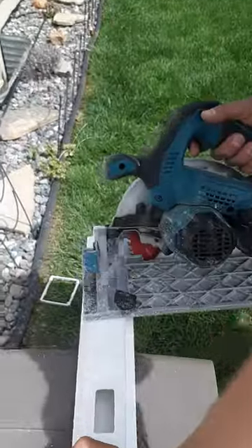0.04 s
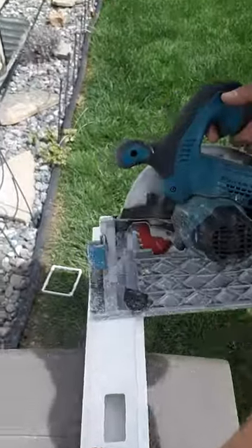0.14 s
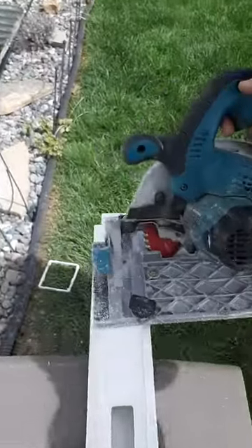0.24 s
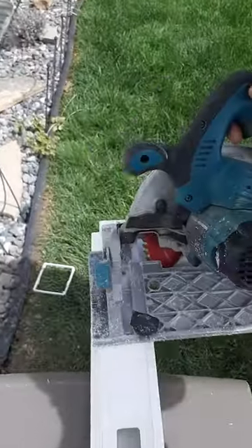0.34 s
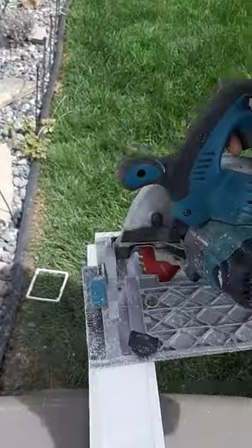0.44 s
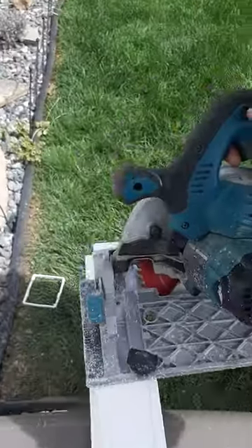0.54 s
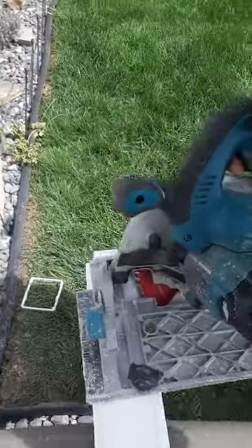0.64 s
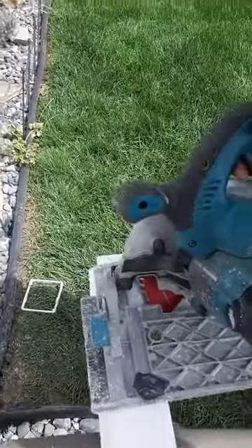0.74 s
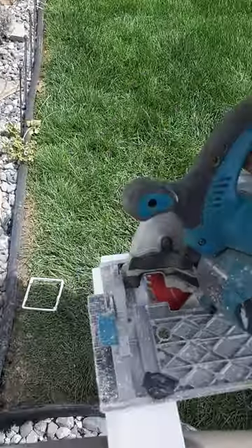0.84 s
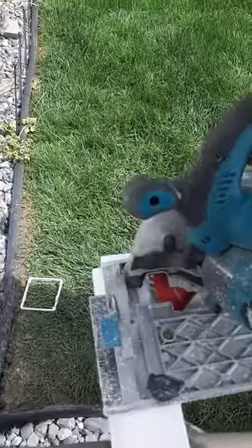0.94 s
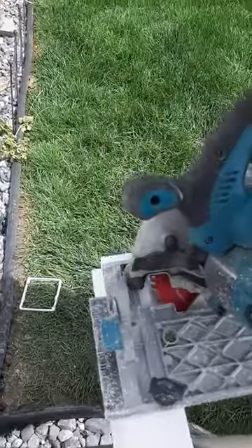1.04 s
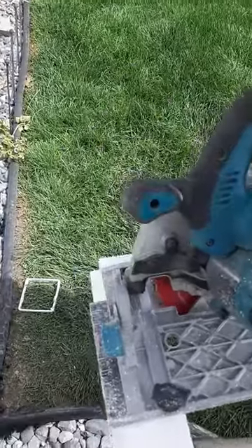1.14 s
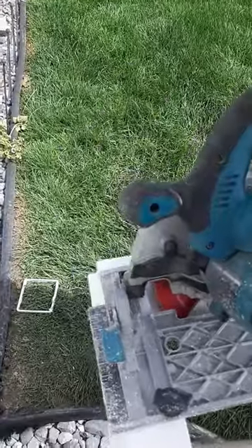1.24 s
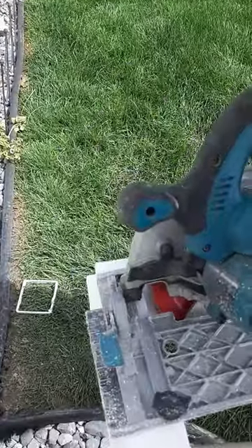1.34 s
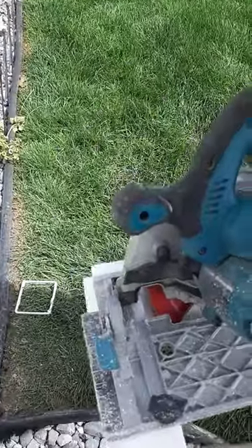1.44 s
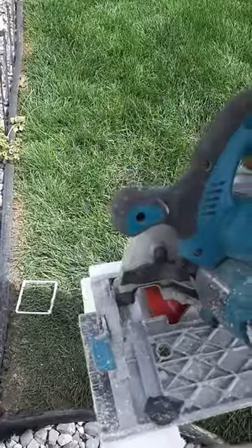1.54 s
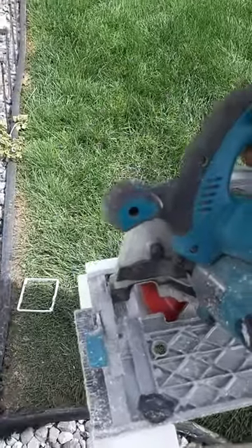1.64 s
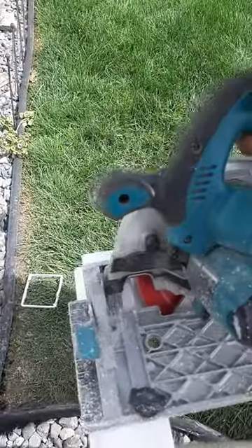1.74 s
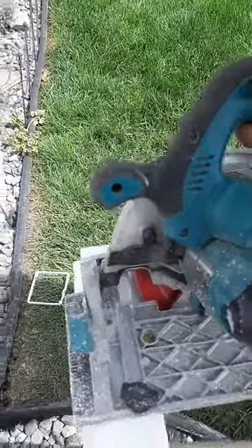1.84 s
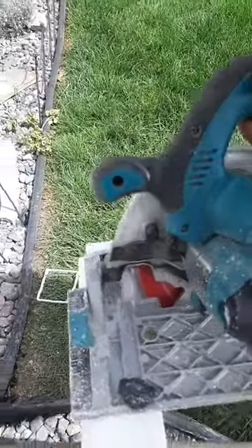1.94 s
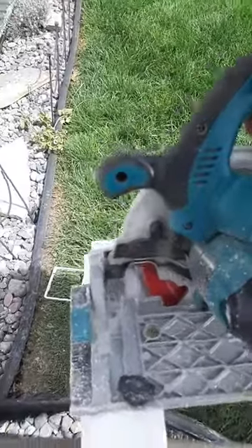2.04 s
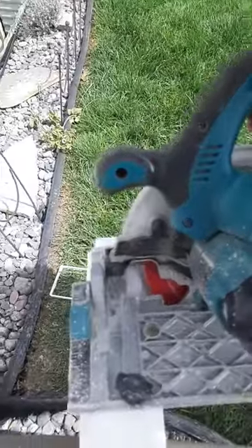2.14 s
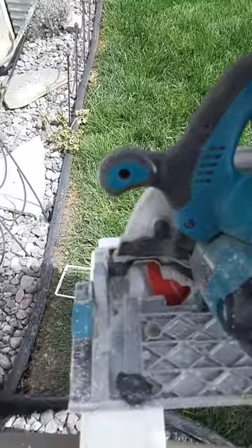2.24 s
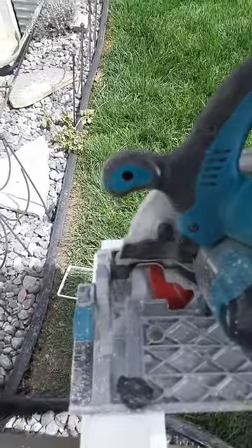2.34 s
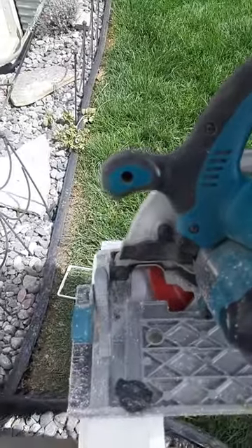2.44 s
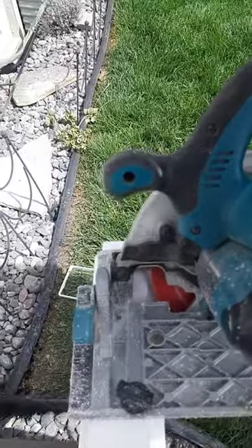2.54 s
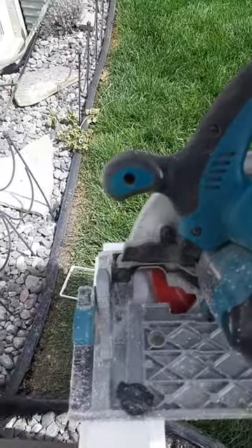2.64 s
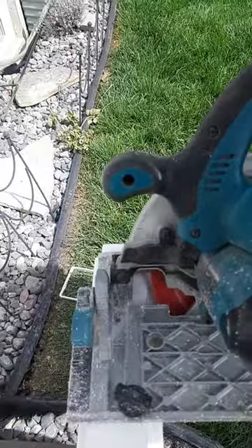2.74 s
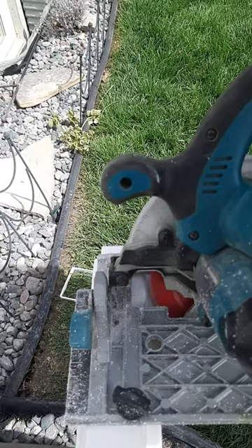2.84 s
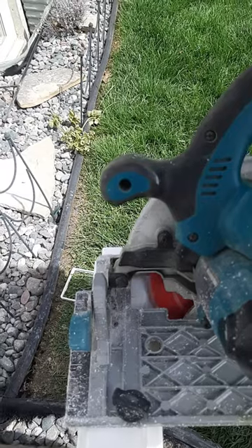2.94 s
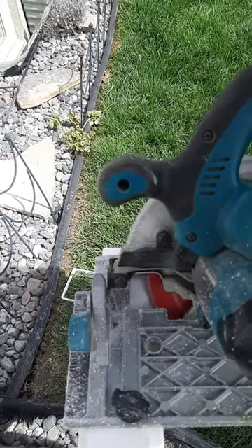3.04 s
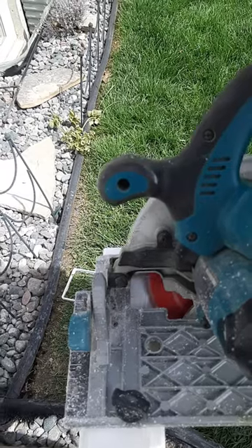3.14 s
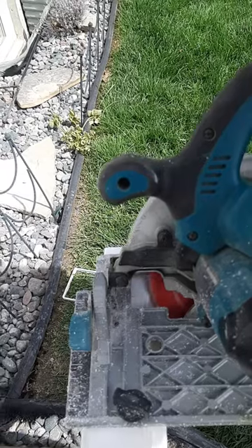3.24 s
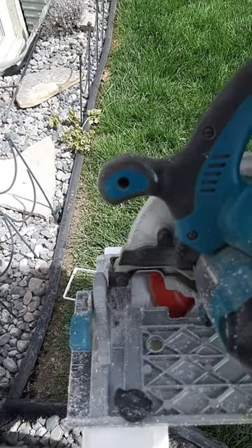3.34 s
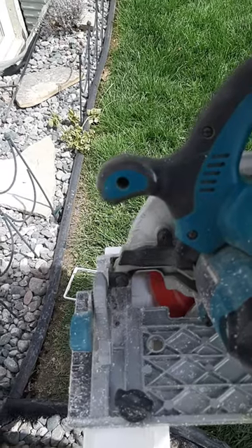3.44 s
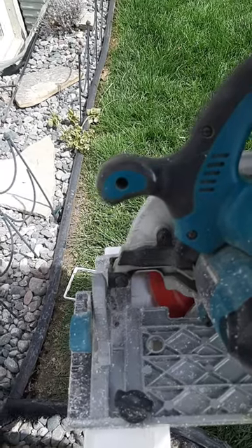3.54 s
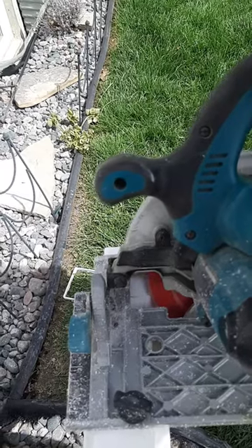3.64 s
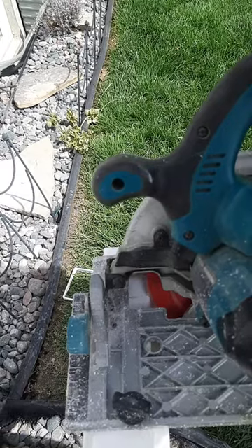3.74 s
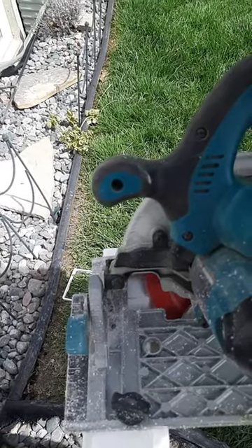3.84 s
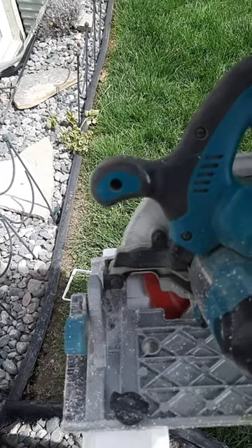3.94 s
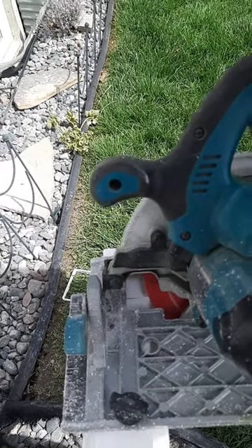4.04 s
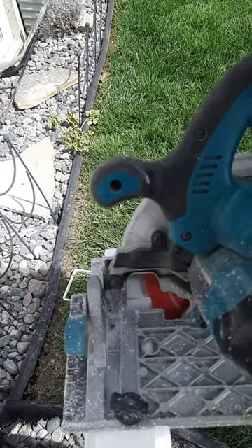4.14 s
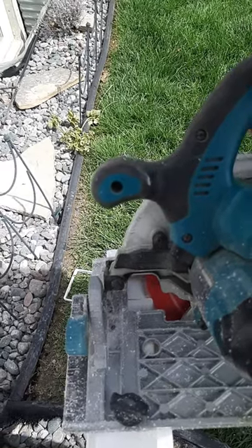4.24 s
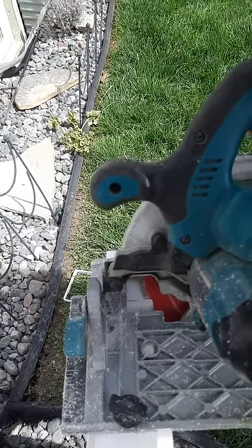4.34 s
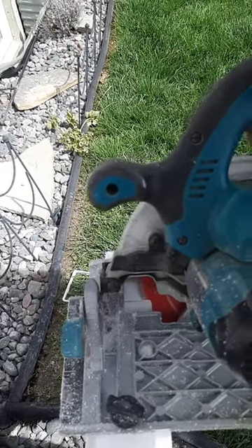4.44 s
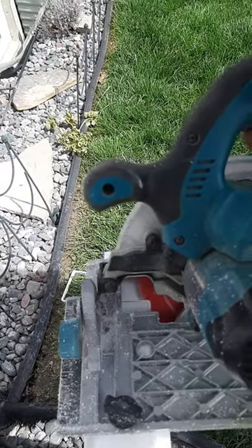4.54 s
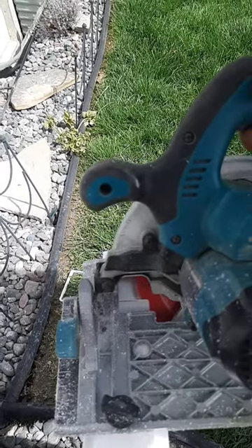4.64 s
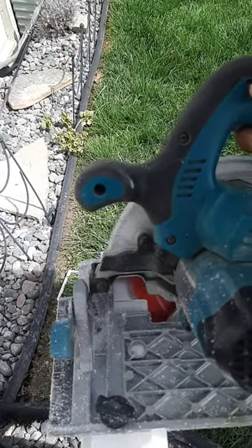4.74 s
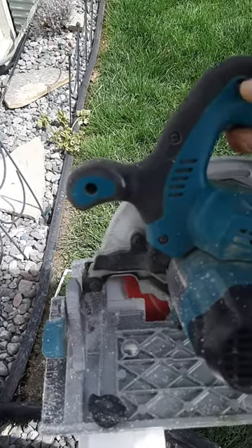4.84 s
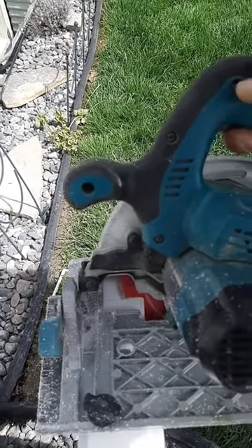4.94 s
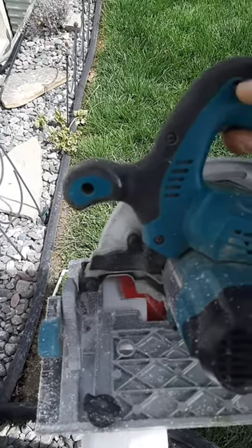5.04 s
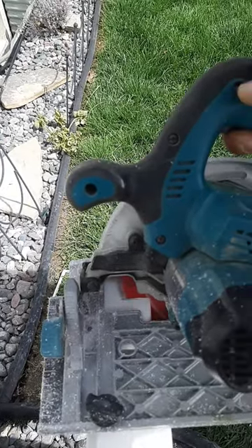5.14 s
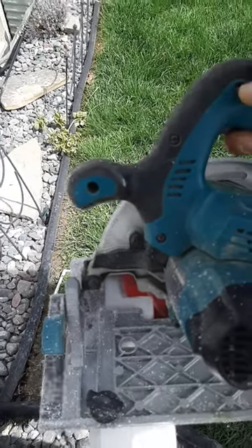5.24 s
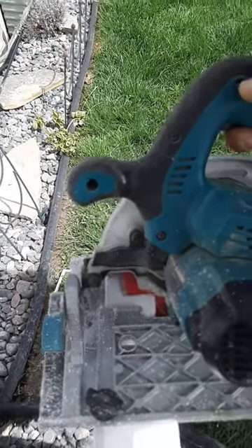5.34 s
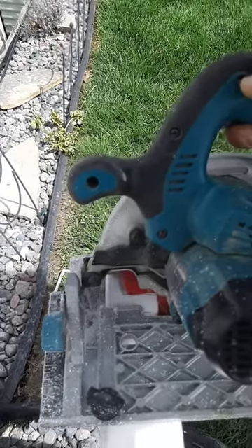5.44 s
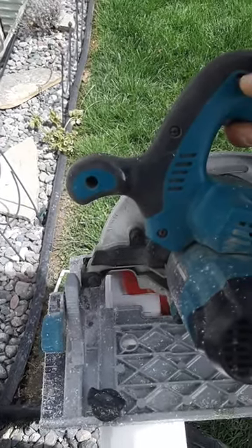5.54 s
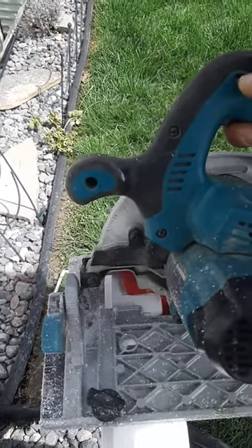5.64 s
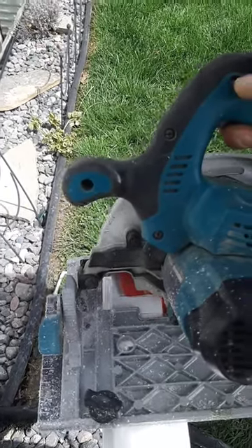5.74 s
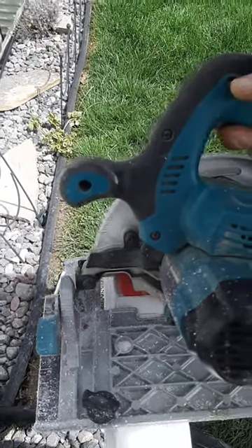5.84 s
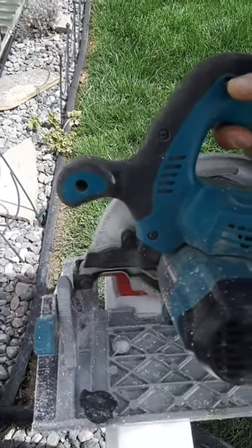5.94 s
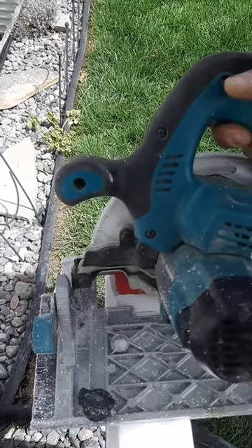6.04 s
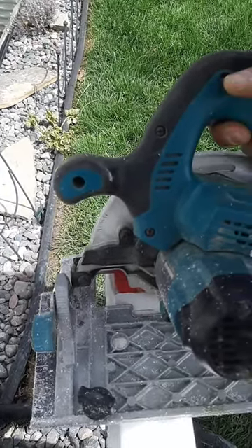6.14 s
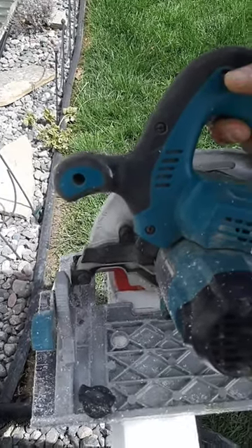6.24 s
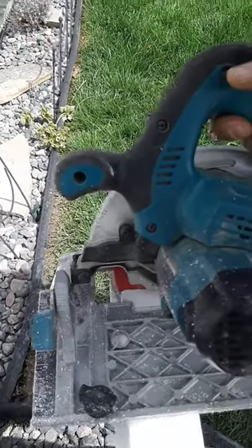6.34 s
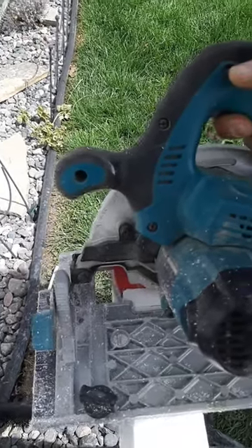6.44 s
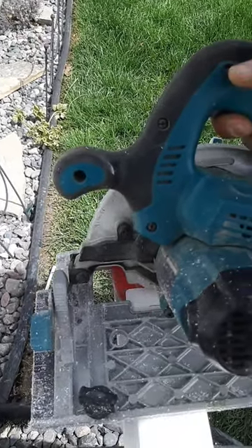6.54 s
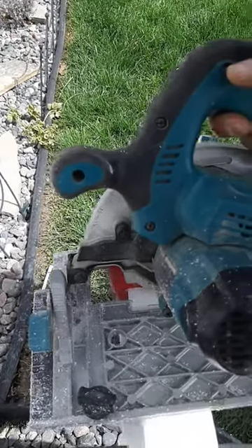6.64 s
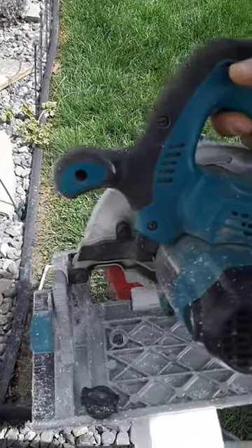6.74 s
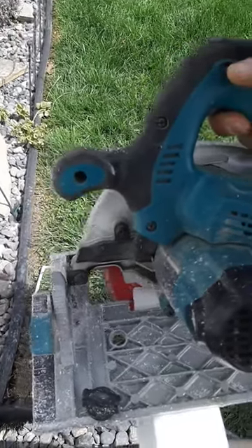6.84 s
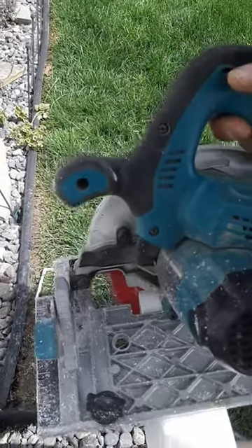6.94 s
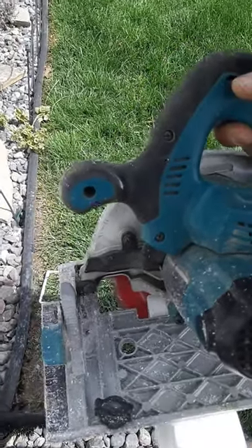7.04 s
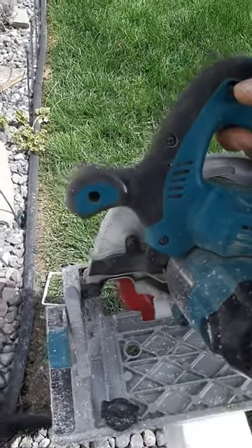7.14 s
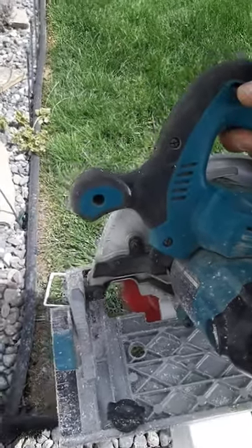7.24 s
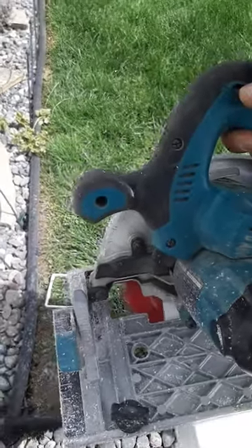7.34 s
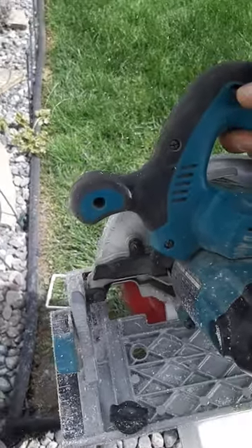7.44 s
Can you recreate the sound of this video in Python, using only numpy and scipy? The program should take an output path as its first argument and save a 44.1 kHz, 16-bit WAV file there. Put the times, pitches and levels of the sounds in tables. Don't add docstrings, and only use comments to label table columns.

```python
import sys
import numpy as np
from scipy import signal
from scipy.fft import rfft, irfft
from scipy.io import wavfile
from scipy.ndimage import uniform_filter1d

SR = 44100
rng = np.random.default_rng(int(sys.argv[2]) if len(sys.argv) > 2 else 0)


def master_out(mix):
    frames = np.transpose(np.atleast_2d(mix))
    ceiling = np.clip(frames, -1, 1)
    pcm = np.round(ceiling * 32767).astype(np.int16)
    wavfile.write(sys.argv[1], SR, pcm)


def magnitude_from_level(level_db):
    exponent = np.asarray(level_db, float) / 20
    return 10 ** exponent


N = 329991
T = np.arange(N) / SR
EARS = np.array([[.5], [-.5]])

PINION_TEETH, WHEEL_TEETH, BLADE_TEETH = 8, 49, 60
TRIGGER_S, TOUCH_S = 1.134, 3.01
FREE_SHAFT_HZ = 444.3
DRIVE_HZ = 1010.5

# [f/Hz, density/dB per Hz]
GARDEN_COLOUR = [(120, -23), (200, -2), (366, -16.5), (548, -10), (1020, -3), (1100, -12), (1270, -3),
                 (2170, -15.5), (2610, -22), (6280, -28), (16000, -57.5)]
# [f/Hz, level/dB]
GARDEN_SIDE = [(60, 11.5), (110, 9), (200, 11), (380, 22), (700, 17), (1290, 4), (2380, 31), (4400, 33),
               (8120, 26.5), (15000, 21)]
# [t/s, f/Hz, level/dB, octave level/dB]
FAR_WHINE = [
    (0.0, 1280, -40, -65),
    (0.03, 1302, -37.5, -68),
    (0.346, 1170, -53, -71),
    (0.5, 1098, -49, -65),
    (0.764, 1116, -50, -64),
    (0.86, 953, -51, -73),
    (0.878, 1052, -57, -73),
    (0.95, 954, -59, -62),
]
# [t/s, peak/dB, ring f/Hz, treble/dB, left minus right/dB]
KNOCKS = [(0.002, -22, 115, -24, 15), (0.067, -29.5, 233, -5, 15), (0.083, -37, 172, 4.5, 16),
          (0.181, -41.5, 102, -11, 19), (0.375, -36.5, 611, -18, 19), (0.456, -30, 175, -37, 13),
          (0.698, -38, 255, -30, 13), (0.861, -37.5, 135, -35, 23), (0.944, -35, 121, -26, 22),
          (0.977, -29, 117, -25, 28), (1.062, -44.5, 890, 7.5, 21), (1.135, -34, 714, -3, 8)]
# [t/s, half length/s, level/dB, left minus right/dB]
GUSTS = [
    (0.0, .07, -30.5, 14),
    (.19, .05, -39, 3),
    (0.436, 0.11, -44, 16),
    (1.05, 0.36, -47, 19),
    (3.074, 0.11, -42, 10),
    (3.75, 0.17, -43.5, 33),
    (4.253, 0.31, -31.5, 36.5),
]
# [multiple of DRIVE_HZ, level/dB]
DRIVE_LINES = [(1, -26), (2, -39.5), (3, -30.5)]
DRIVE_FADE_S = [0.27, 0.43, 0.1]
# [multiple of shaft, level/dB]
SHAFT_LINES = [(1, -19), (2, -12), (3, -13), (6, -11), (9, -16), (10, -7), (11, -6), (13, -12), (15, -8),
               (18, -19), (20, -19), (21, -10), (25, -15), (26, -14), (30, -13), (31, -13)]
# [f/Hz, density/dB per Hz]
FAN_COLOUR = [(88, -54), (150, -35), (303, -27), (439, -11.5), (821, -2), (888, -3.5), (1390, 0.5),
              (1980, -7.5), (2600, -1.5), (4670, -4.5), (5250, -4), (6910, -2.5), (7620, -9), (9080, -6),
              (16000, -8)]
# [f/Hz, level/dB]
FAN_SIDE = [(60, 4.3), (110, 6.7), (200, 3), (380, 6.1), (700, 10), (1290, 1.3), (2380, 9.3), (4400, 13.2),
            (8120, 3.36), (15000, 2.1)]
# [f/Hz, width/Hz, level/dB]
HOUSING = [(1810, 130, 14.5), (2640, 430, 11), (3430, 220, 14.5), (3900, 420, 17), (5340, 1000, 11),
           (6220, 1400, 18), (10200, 2700, 15.5), (12000, 800, 11)]
# [t/s, tooth pair f/Hz]
LOADED_PAIR_HZ = [(3.0, 2174.9), (3.375, 2147), (3.85, 2103.5), (4.35, 2059.3), (4.55, 2060.1),
                  (4.725, 2052.9), (5.0, 2082), (5.275, 2094.7), (5.5, 2086.3), (5.825, 2055.3),
                  (6.15, 2050.5), (6.4, 2014.2), (6.5, 2008.0), (6.675, 2005.9), (6.875, 2039.0),
                  (7.025, 2024.8), (7.15, 2031), (7.48, 2028)]
# [t/s, end/s, left/dB, right/dB]
SQUEALS = [(3.02, 3.13, -20.5, -40), (3.17, 3.216, -18.5, -42), (3.26, 3.403, -24, -50),
           (3.51, 3.6, -24.5, -32), (3.706, 3.72, -14.5, -20), (3.825, 4.156, -11.5, -26.5),
           (4.294, 4.447, -12.5, -22), (4.577, 4.702, -11.5, -20), (5.193, 5.5, -19, -28.5),
           (5.586, 5.768, -9.5, -36), (5.88, 5.88, -12.5, -32), (6.004, 6.06, -15, -17),
           (6.078, 6.15, -6.5, -19), (6.179, 6.285, -5, -2), (6.3, 6.355, -7, -13), (6.4, 6.45, -16.5, -21),
           (6.54, 6.58, -15, -19), (6.837, 6.92, -29.5, -23), (6.96, 6.986, -15, -26),
           (7.02, 7.144, -21, -29), (7.348, 7.436, -34, -30)]
# [t/s, length/s, level/dB]
SLIPS = [
    (6.224, 0.05, -11.5),
    (6.288, 0.005, -8),
    (6.304, 0.0053, -10),
    (6.151, .006, -4),
    (5.797, .008, -10),
    (5.622, .005, -6),
]
# [t/s, end/s, multiple of tooth pair, level/dB]
FLARES = [(3.48, 4.116, 1, -33), (4.5, 4.7, 1, -33), (4.94, 5.207, 1, -34), (5.93, 5.97, 1, -32),
          (6.174, 6.415, 1, -30), (6.664, 6.724, 1, -31), (7.097, 7.42, 1, -35), (3.5, 3.8, 3, -30),
          (4.95, 5.5, 3, -34.5), (5.8, 5.943, 3, -28), (6.205, 6.3, 3, -33), (6.553, 6.695, 3, -29.5),
          (7.052, 7.255, 3, -32), (3.02, 3.22, 4, -28), (3.7, 4.15, 4, -38), (4.78, 4.996, 4, -28),
          (5.15, 5.224, 4, -26), (5.8, 6.15, 4, -36), (6.355, 6.62, 4, -29), (6.8, 7.25, 4, -26),
          (7.396, 7.43, 4, -31.5), (3.7, 4.2, 6, -33), (4.78, 4.855, 6, -21.5), (5.05, 5.28, 6, -22),
          (6.19, 6.463, 6, -25.5), (6.8, 6.95, 6, -29), (7.194, 7.265, 6, -25.5), (7.39, 7.414, 6, -39)]
# [multiple of tooth pair, level over the sixth/dB]
UPPER_LINES = [(5, -6.5), (7, -9)]
# [t/s, end/s, level/dB]
GRIND = [
    (3.08, 3.56, -25.5),
    (4.45, 4.7, -31),
    (6.0, 6.4, -33.5),
    (7.2, 7.27, -30),
]
# [t/s, feed pressure/dB, blade showing to the left port/dB]
FEED = [(3.0, -1, 16), (3.07, -1, 14), (3.19, -6, 15), (3.69, 2, 9), (4.22, 2, 10.5), (4.55, 2, 9),
        (4.83, 0, 1), (5.4, -3, 6.5), (5.98, 1.5, 3.5), (6.43, 2.5, 1), (6.52, 3.5, 3.5), (7.2, 1, 4),
        (7.28, -8.5, 4), (7.42, -3.5, 3), (7.48, -15, -4)]
# [f/Hz, density/dB per Hz]
KERF_COLOUR = [(88, -32), (150, -15.5), (854, -4), (1170, -5), (1500, 2.5), (2100, 1), (2920, -2.5),
               (3160, -8.5), (3420, -7.5), (6390, -4), (7620, -12), (8400, -0.5), (10200, 0), (14800, -4.5),
               (16000, -3.5)]
# [f/Hz, level/dB]
KERF_SIDE = [(60, 6.0), (110, 8.5), (200, 22), (380, 14.2), (700, 2.4), (1290, 5.3), (2380, 0.58),
             (4400, 13.6), (8120, 2.5), (15000, 0.95)]
# [t/s, end/s, f/Hz, level/dB, left minus right/dB]
RINGS = [
    (3.01, 3.16, 9100, -24, 9),
    (3.02, 3.13, 5650, -31, 18),
    (3.403, 3.75, 5320, -35, 26),
    (4.12, 4.546, 5640, -32.5, 24),
    (4.1, 4.598, 490, -41.5, 20),
    (4.33, 4.653, 1870, -29, -8),
    (4.685, 4.73, 1960, -20.5, -3),
    (6.384, 7.158, 546, -35.5, 2),
]


def curves(table):
    s, *columns = np.transpose(table)
    return [np.interp(T, s, column) for column in columns]


def unit(x):
    return x / np.sqrt(np.mean(x ** 2))


def shade(x, colour, side):
    log_hz = np.log(np.maximum(np.fft.rfftfreq(N + 9, 1 / SR), 20))
    colour_db, side_db = [np.interp(log_hz, np.log(hz), db) for hz, db in map(np.transpose, (colour, side))]
    spectrum = rfft(x, N + 9) * magnitude_from_level(colour_db + EARS * side_db)
    return unit(irfft(spectrum, N + 9)[:, :N])


def band(x, lo_hz, hi_hz, order=2):
    sos = signal.butter(order, [lo_hz, min(hi_hz, .45 * SR)], "band", fs=SR, output="sos")
    return signal.sosfilt(sos, x)


def walk(rate_hz):
    k = int(SR / rate_hz)
    steps = np.repeat(rng.standard_normal((2, N // k + 1)), k, axis=1)
    smooth = uniform_filter1d(uniform_filter1d(steps, k), k)
    return 1.43 * smooth[:, :N]


def ports(x, alike):
    alike = np.clip(alike, 0, .99)
    return np.array([x[0], alike * np.roll(x[0], 9) + np.sqrt(1 - alike ** 2) * x[1]])


def air(alike_hz):
    x = rng.standard_normal((2, N))
    low = signal.butter(1, alike_hz, fs=SR, output="sos")
    right = ports(x, 0.18)[1]
    return np.array([x[0], right + signal.sosfilt(low, x[0] - right)])


def line(turns, hz, wander_db, rate_hz):
    phase = 2 * np.pi * turns + .5 * walk(rate_hz) + 6 * rng.random((2, 1))
    return np.sqrt(2) * np.sin(phase) * magnitude_from_level(wander_db * walk(rate_hz)) * (hz < 16200)


def held(rows, rest_db, rise_db_s, fall_db_s):
    levels_db = [rest_db + 0 * T]
    for s, end, db in rows:
        levels_db.append(db - rise_db_s * np.maximum(s - T, 0) - fall_db_s * np.maximum(T - end, 0))
    return magnitude_from_level(np.max(levels_db, axis=0))


def garden():
    hz, db, octave_db = curves(FAR_WHINE)
    turns = np.cumsum(hz) / SR
    far = magnitude_from_level(db + 1.0) * line(turns, hz, 0.89, 24) + magnitude_from_level(octave_db) * line(2 * turns, hz, 3.3, 8.9)
    far = far * np.clip((.98 - T) / .05, 0, 1) * magnitude_from_level(EARS * 7.5)
    still_air = magnitude_from_level(-46.5 + 2.5 * walk(8.2)) * shade(air(700.), GARDEN_COLOUR, GARDEN_SIDE)
    hiss = magnitude_from_level(-67 + EARS * 12) * band(rng.standard_normal((2, N)), 9000, 19000)
    return far + still_air + hiss


def knocks():
    out, t = np.zeros((2, N)), np.arange(SR // 8) / SR
    t60_s = 0.056
    fall = np.exp(-np.log(1000) * t / t60_s)
    for s, db, hz, treble_db, side_db in KNOCKS:
        grit = band(rng.standard_normal((2, len(t))), 1800, 6250)
        hit = fall * (np.sin(2 * np.pi * hz * t) + magnitude_from_level(treble_db + 8.0) * grit)
        start = int(s * SR)
        out[:, start:start + len(t)] += hit * magnitude_from_level(db + EARS * side_db)
    return out


def blast():
    breeze_db, calm_s = -46, 7.2
    gain = magnitude_from_level(breeze_db + EARS * 9.4 - 110 * np.maximum(T - calm_s, 0))
    for s, half_s, db, side_db in GUSTS:
        gain = gain + magnitude_from_level(db + EARS * side_db) * np.exp(-((T - s) / half_s) ** 2)
    rough = rng.standard_normal((2, N)) * magnitude_from_level(3.3 * walk(40))
    buffet = band(band(rough, 48, 1800), 94, 335, order=1)
    return unit(buffet) * magnitude_from_level(-6.5) * gain


def drive():
    t = np.maximum(T - TRIGGER_S, 0)
    out = 0
    for (k, db), fade_s in zip(DRIVE_LINES, DRIVE_FADE_S):
        envelope = np.clip(t / 0.028, 0, 1) * np.exp(-(t / fade_s) ** 4)
        out = out + magnitude_from_level(db + EARS * 17.2) * envelope * line(k * DRIVE_HZ * T, DRIVE_HZ, 0.57, 16)
    return out


def run_up():
    start_hz, gain_hz_s, surge_hz_s2 = 32, 483, 1011
    ramp_s, settle_s = .354, .104
    t = np.clip(T - TRIGGER_S, 0, ramp_s)
    ramp_hz = start_hz + gain_hz_s * t + surge_hz_s2 * t ** 2
    lag = np.exp(-np.maximum(T - TRIGGER_S - ramp_s, 0) / settle_s)
    return FREE_SHAFT_HZ - (FREE_SHAFT_HZ - ramp_hz) * lag


def housing(hz):
    peaks = sum(magnitude_from_level(db) / (1 + (2 * (hz - f) / width) ** 2) for f, width, db in HOUSING)
    return 0.2 + 0.27 / (1 + (hz / 1100) ** 4) + peaks / 3


def fan_tilt(hz):
    return magnitude_from_level(EARS * np.interp(hz, *np.transpose(FAN_SIDE)))


def motor(shaft_hz):
    decades = np.log10(shaft_hz / FREE_SHAFT_HZ)
    turns = np.cumsum(shaft_hz) / SR
    wheel = turns * PINION_TEETH / WHEEL_TEETH
    runout = np.cos(2 * np.pi * wheel)
    push = np.maximum(np.gradient(shaft_hz) * SR / 900, 0) * (T < TOUCH_S)

    fan = shade(air(1450.0), FAN_COLOUR, FAN_SIDE) * (1 + 0.11 * runout) * magnitude_from_level(1.13 * walk(9))
    out = magnitude_from_level(-17 + 3 * decades) * band(fan, 78, 5700, order=3)
    out = out + magnitude_from_level(-18 + 19 * decades) * band(fan, 8500, 16600, order=3)

    tones = 0
    for k, db in SHAFT_LINES + [(12, 0.9)]:
        hz = k * shaft_hz
        tones = tones + magnitude_from_level(db) * fan_tilt(hz) * line(k * turns, hz, 2.4, 8)
    pole_db = -30.5 + 12 * decades + 4.8 * np.exp(-((T - 1.8) / 0.34) ** 2)

    mesh = 0
    for k, db in [(1, 2.5), (2, 1), (3, -1.5), (4, -4.0), (5, -8)]:
        order = k * PINION_TEETH
        hz = order * shaft_hz
        mesh = mesh + magnitude_from_level(db) * fan_tilt(hz) * housing(hz) * line(order * turns, hz, 2.2, 40)
    mesh_db = -30 + 12 * np.log10(push + .025)

    beat = np.diff(np.floor(wheel), prepend=0) * (1 + .5 * np.cos(np.pi * np.floor(wheel)))
    hits = (beat + 0.3 * (rng.random(N) < 200 / SR)) * magnitude_from_level(4.2 * rng.standard_normal(N))
    rattle = unit(band(hits, 3500, 3700)) * fan_tilt(3600.)
    rattle_db = -30.5 - 17 * np.clip(np.maximum(0.46 * push, (T - TOUCH_S) / 0.1), 0, 1)

    out = out + magnitude_from_level(pole_db) * tones + magnitude_from_level(mesh_db) * mesh * (1 + 0.21 * runout) + magnitude_from_level(rattle_db) * rattle
    return out * magnitude_from_level(EARS * 5.5)


def teeth(pair_hz):
    turns = np.cumsum(pair_hz) / SR
    wobble = 1 + 0.18 * np.cos(2 * np.pi * turns * 2 / BLADE_TEETH)

    def flare(k):
        rows = [(s, end, db) for s, end, multiple, db in FLARES if round(multiple) == k]
        return held(rows, -40.5, 94, 70)

    sixth = flare(6)
    gains = [(k, flare(k)) for k in (1, 3, 4)] + [(6, sixth)]
    gains += [(2 * WHEEL_TEETH / BLADE_TEETH, magnitude_from_level(1.0) * held(GRIND, -35.5, 69, 42))]
    gains += [(round(k), sixth * magnitude_from_level(db)) for k, db in UPPER_LINES]
    overtones = sum(g * magnitude_from_level(1.5 + EARS * 3) * line(k * turns, k * pair_hz, 1.2, 14) for k, g in gains)

    slip_db = 0
    for s, length_s, db in SLIPS:
        slip_db = slip_db + db * np.clip(np.minimum(T - s, s + length_s - T) / 0.0019 + .5, 0, 1)
    rows = np.array(SQUEALS)
    left = held(rows[:, [0, 1, 2]], -28.5, 130, 107)
    right = held(rows[:, [0, 1, 3]], -36, 136, 123)
    tooth = np.array([left, right]) * magnitude_from_level(slip_db) * line(2 * turns, 2 * pair_hz, 0.12, 45)
    return wobble * (tooth + overtones)


def blade_force(blade_hz):
    turns = np.cumsum(blade_hz) / SR
    slow = turns / 14
    uneven = magnitude_from_level(np.linspace(1, 5, 236)[:, None] * rng.standard_normal((2, 60, 236, 1)))
    orders = rng.standard_normal((2, 60, 236, 2)) * uneven
    pattern = irfft(orders[..., 0] + 1j * orders[..., 1], 4096)
    row, place = slow.astype(int), ((turns % 1) * 4096).astype(int)
    blend = (slow - row) * np.pi / 2
    again = pattern[:, row, place] * np.cos(blend) + pattern[:, row + 1, place] * np.sin(blend)
    chips = unit(air(500.0) * magnitude_from_level(2 * walk(300)))
    return 0.74 * unit(ports(again, 0.13)) + .6 * chips


def scrape(blade_hz):
    feed_db, side_db = curves(FEED)
    force = blade_force(blade_hz)
    x = shade(force, KERF_COLOUR, KERF_SIDE)
    parts = [(feed_db - 21, 300, 800),
             (feed_db - 19.5 - 0.11 * side_db, 900, 2700),
             (feed_db - 19.5 + 0.7 * side_db, 3200, 6700),
             (0.59 * feed_db - 17.5, 8000, 19000)]
    out = sum(magnitude_from_level(db + 1.86 * walk(14)) * band(x, lo, hi, order=3) for db, lo, hi in parts)
    out = out * magnitude_from_level(EARS * (side_db - 6.0))
    for s, end, hz, db, ring_side_db in RINGS:
        half_hz = (110 + 0.074 * hz) / 2
        touch = np.clip(np.minimum(T - s, end - T) / 0.022, 0, 1)
        ring = unit(band(force, hz - half_hz, hz + half_hz))
        out = out + touch * magnitude_from_level(db + EARS * ring_side_db + 2 * walk(12)) * ring
    return out


def scene():
    pair_hz = curves(LOADED_PAIR_HZ)[0]
    blade_hz = pair_hz * 2 / BLADE_TEETH
    shaft_hz = np.where(T < TOUCH_S, run_up(), blade_hz * WHEEL_TEETH / PINION_TEETH)

    since_trigger, since_touch = np.maximum(T - TRIGGER_S, 0), np.maximum(T - TOUCH_S, 0)
    rise_db = -5 * np.exp(-since_trigger / 0.1)
    buried_db = -11.5 * (1 - np.exp(-since_touch / 0.5))
    running = np.clip((T - TRIGGER_S) / 0.00081, 0, 1) * magnitude_from_level(rise_db + buried_db)
    cutting = np.clip((T - TOUCH_S) / .07, 0, 1)

    background = garden() + knocks() + blast()
    saw = drive() + running * motor(shaft_hz)
    return background + saw + cutting * (teeth(pair_hz) + scrape(blade_hz))


def roll_off(x):
    return signal.sosfilt(signal.butter(12, 16370, fs=SR, output="sos"), x)


def record(dry):
    top = signal.ellip(10, .2, 60, 15700, fs=SR, output="sos")
    mix = np.clip(signal.sosfilt(top, dry), -1, 1)
    return roll_off(mix)


dry = scene()
out = record(dry)
master_out(out)
```